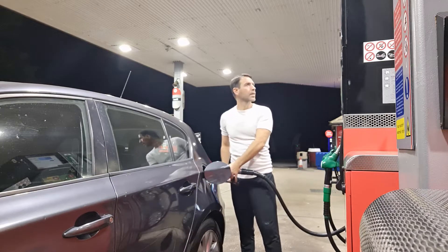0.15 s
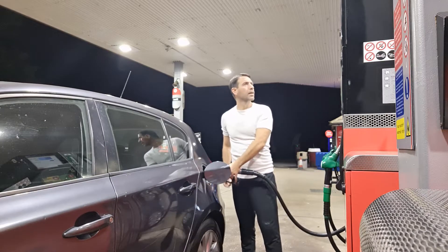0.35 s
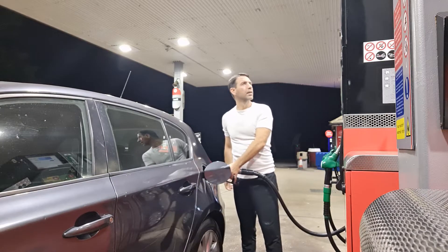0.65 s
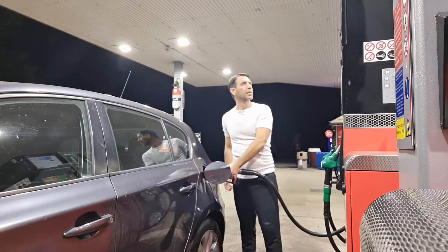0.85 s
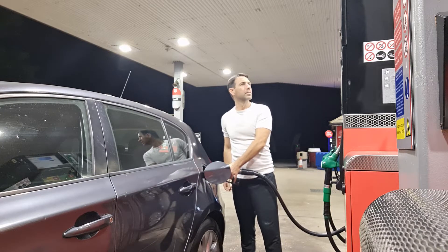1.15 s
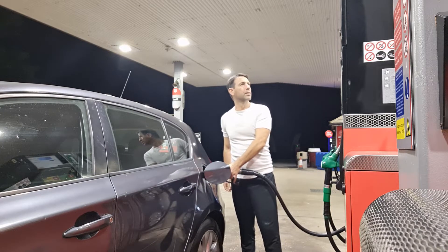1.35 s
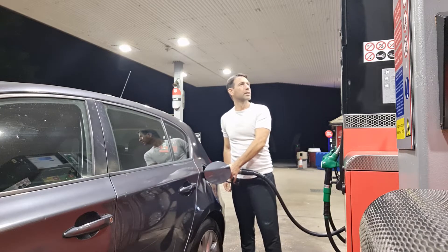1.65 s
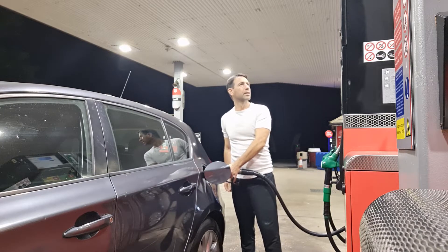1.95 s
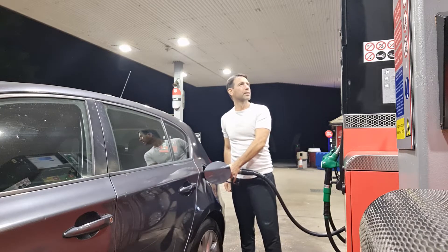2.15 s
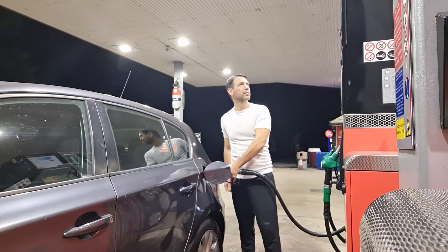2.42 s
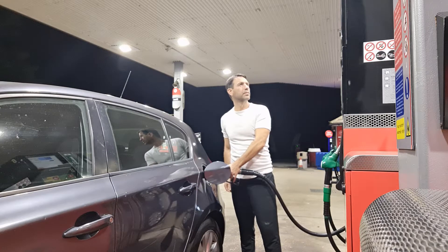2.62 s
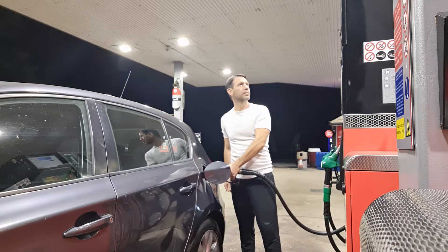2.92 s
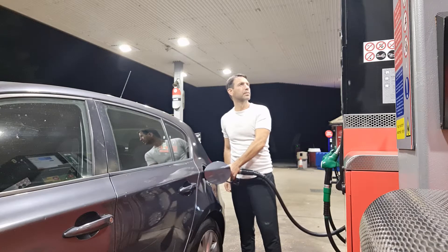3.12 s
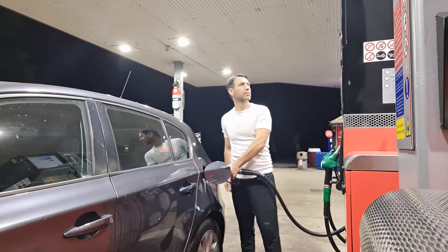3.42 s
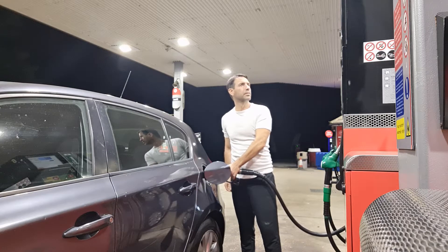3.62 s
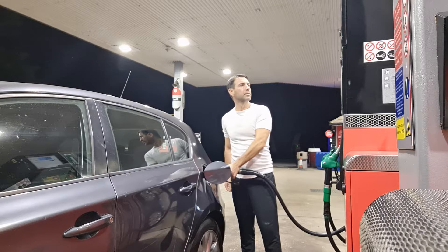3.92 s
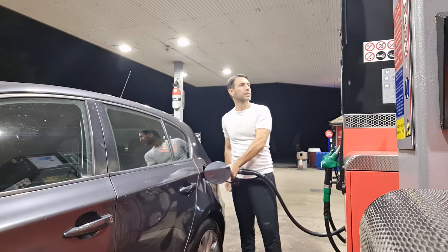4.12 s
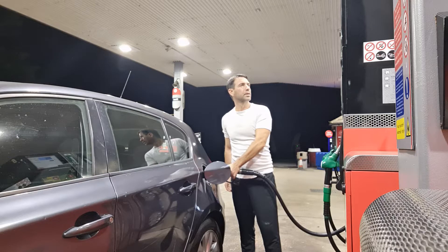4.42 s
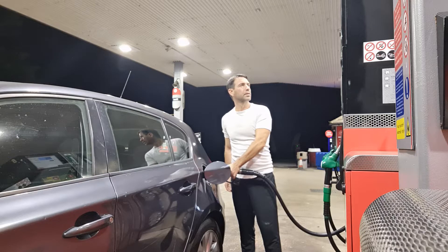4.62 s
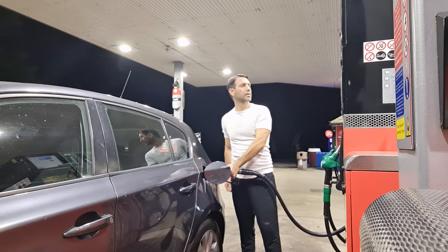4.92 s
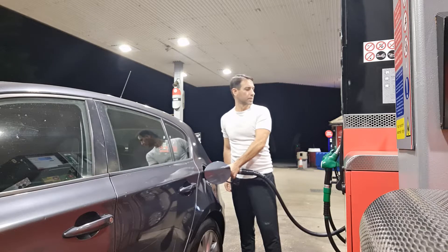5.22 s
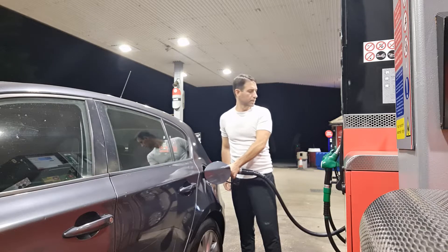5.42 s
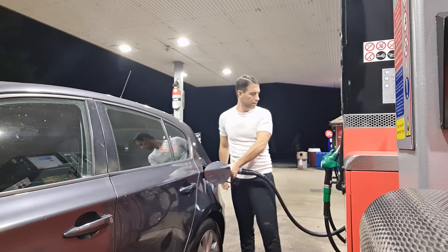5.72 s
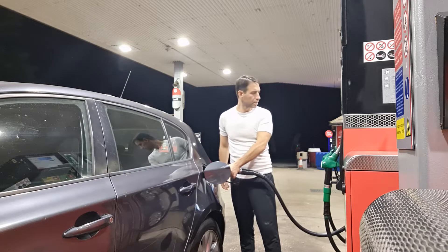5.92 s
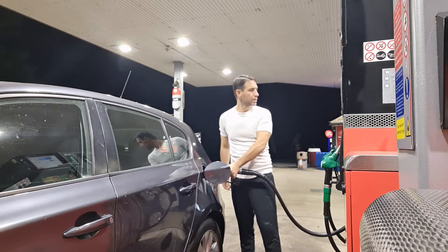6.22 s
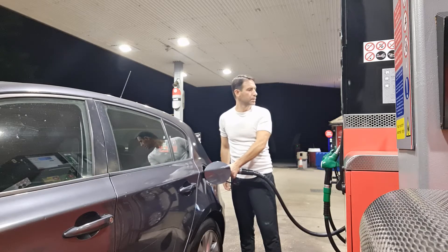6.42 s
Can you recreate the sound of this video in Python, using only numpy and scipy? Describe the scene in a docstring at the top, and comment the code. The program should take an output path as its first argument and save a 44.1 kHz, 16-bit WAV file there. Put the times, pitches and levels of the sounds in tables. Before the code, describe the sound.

A fuel pump hums and rattles steadily while fuel hisses into a car, nozzle knocks, then a heavy clunk as a second motor joins.

```python
"""Petrol station canopy: diesel flows into a car while the dispenser to the right hums, whirs and rattles.
Hum and pump are sums of tones; the rattle is noise pulsed by the pump strokes through panel resonances.
Fuel hiss and forecourt rush are shaped noise; nozzle knocks are damped modes with a short canopy tail.
Near halfway a second motor spins up with a low drone, then a heavy clunk of noise bursts and modes lands;
from there its overtones join, some beating slowly against the pump's."""
import sys
import numpy as np
from scipy import signal
from scipy.fft import rfft, irfft, next_fast_len
from scipy.io import wavfile
from scipy.ndimage import map_coordinates

SR = 44100
rng = np.random.default_rng(int(sys.argv[2]) if len(sys.argv) > 2 else 0)


def master_out(mix):
    """Clip the mix to full scale and print it as 16-bit PCM to the path in sys.argv[1]."""
    frames = np.transpose(np.atleast_2d(mix))
    ceiling = np.clip(frames, -1, 1)
    pcm = np.round(ceiling * 32767).astype(np.int16)
    wavfile.write(sys.argv[1], SR, pcm)


N = 289296
TIME_S = np.arange(N) / SR


def amp(db):
    """Decibels to gain."""
    return 10 ** (np.asarray(db) / 20)


def unit(x):
    """Scaled to rms 1."""
    return x / np.sqrt(np.mean(x ** 2) + 1e-20)


def along(points, hz):
    """Interpolate (hz, value) points on a log-frequency axis."""
    point_hz, values = np.transpose(points)
    return np.interp(np.log(hz + 1), np.log(point_hz + 1), values)


def wobble(rate_hz):
    """A smooth random curve with rate_hz knots a second."""
    knots = rng.standard_normal(int(N * rate_hz / SR) + 4)
    return map_coordinates(knots, [TIME_S * rate_hz])


def filtered(x, response):
    """x times a response of frequency, zero-padded."""
    n = x.shape[-1]
    padded = next_fast_len(n + 8192)
    spectrum = rfft(x, padded) * response(np.fft.rfftfreq(padded, 1 / SR))
    return irfft(spectrum, padded)[..., :n]


def coloured(x, spectrum):
    """x given a (hz, level_db) spectrum, at rms 1."""
    return unit(filtered(x, lambda hz: amp(along(spectrum, hz))))


def spread(pair, correlation):
    """Two unrelated signals become left and right with the given (hz, correlation) points."""
    def shares(hz):
        angle_rad = np.arccos(np.clip(along(correlation, hz), -1, 1)) / 2
        return np.array([np.cos(angle_rad), np.sin(angle_rad)])
    mid, side = filtered(pair, shares)
    return np.array([mid + side, mid - side])


def pan(left_minus_right_db):
    """Left and right gains for a level difference."""
    return amp(np.array([[.5], [-.5]]) * left_minus_right_db)


def from_right(pair, lag_s):
    """The left ear hears the sound lag_s after the right: half the lag as phase on each side."""
    return filtered(pair, lambda hz: np.exp(1j * np.pi * hz * lag_s * np.array([[-1], [1]])))


def add(track, start_s, sound):
    """Mix a sound into the track, cut at the track's end."""
    part = track[:, round(start_s * SR):][:, :sound.shape[-1]]
    part += sound[..., :part.shape[-1]]


def ring(modes, t_s, attack_s):
    """Damped (hz, level_db, t60_s) modes, each struck at a slightly random strength."""
    scatter_db = rng.normal(0, 1.2, len(modes))
    waves = 0
    for (hz, level_db, t60_s), offset_db in zip(modes, scatter_db):
        waves = waves + amp(level_db + offset_db - 60 * t_s / t60_s) * np.sin(2 * np.pi * hz * t_s)
    return waves * (1 - np.exp(-t_s / attack_s))


def line(phase_rad, left_db, right_db, waver_db):
    """One machine tone; it wavers and reaches the two ears slightly out of step."""
    phase_rad = phase_rad + rng.uniform(0, 2 * np.pi) + 0.18 * wobble(5.9)
    phase_rad = phase_rad + 0.14 * rng.standard_normal((2, 1))
    gain = np.sqrt(2) * amp([[left_db], [right_db]]) * amp(waver_db * wobble(3.025))
    return gain * np.sin(phase_rad)


def ramp(start_s, length_s):
    """A raised-cosine step from 0 to 1."""
    return (1 - np.cos(np.pi * np.clip((TIME_S - start_s) / length_s, 0, 1))) / 2


# second motor's start, spin-up, then labouring hold and release
START_S, SPIN_UP_S, STRAIN_HOLD_S, STRAIN_RELEASE_S = 2.75, 0.63, 0.6, 0.94


def running():
    """How far the second motor has come up to speed, 0-1."""
    return ramp(START_S, SPIN_UP_S)


def strain():
    """How hard the second motor labours, 0-1: it rises with the spin-up, holds and lets go."""
    return running() * (1 - ramp(START_S + SPIN_UP_S + STRAIN_HOLD_S, STRAIN_RELEASE_S))


def under_load(alone_db, running_change_db, strain_change_db):
    """The level in dB of a sound that responds to the second motor's load."""
    return alone_db + running_change_db * running() + strain_change_db * strain()


# pump tones: shaft_order (rounded when played; entries above 22 ease off), left_db, right_db
PUMP_ORDERS = [(5, -67, -62), (6, -57, -51.5), (8, -45.5, -40), (9, -49, -47.5), (10, -60, -47.5),
               (12, -55, -43), (14, -55.5, -54.5), (15, -52, -58), (16, -56, -46), (18, -55, -49),
               (20, -58.5, -55.5), (21, -63, -61.5), (22.2, -67, -68), (24, -55, -51), (26, -61, -49.5),
               (28, -72, -58), (32, -63.5, -56)]
# mains hum: alone_db, running_change_db, strain_change_db
HUM_LOAD = (-26, -0.5, -2.5)
SHAFT_HZ, HUM_HZ, FAN_HZ = 33.125, 99.8, 115
WHINE_DB, WHINE_EASED_DB, EASE_AT_S, EASE_S = 0.6, -15, 3.92, 0.5  # upper orders: gain before, after


def pump(shaft_rad):
    """Mains hum that sags under load, a fan tone and the pump's shaft orders; the upper ones ease off."""
    hum_db = under_load(*HUM_LOAD) + 0.47 * wobble(3.95) + 0.13 * wobble(11)
    hum = np.sqrt(2) * amp(hum_db) * np.sin(2 * np.pi * HUM_HZ * TIME_S)
    fan = line(2 * np.pi * FAN_HZ * TIME_S, left_db=-41.5, right_db=-40.5, waver_db=3.4)
    whine = amp(WHINE_DB + (WHINE_EASED_DB - WHINE_DB) * ramp(EASE_AT_S, EASE_S))
    orders = 0
    for order, left_db, right_db in PUMP_ORDERS:
        tone = line(round(order) * shaft_rad, left_db, right_db, waver_db=1.63)
        orders = orders + tone * (whine if order > 22 else 1)
    return hum * pan(-0.022) + fan + orders


# dispenser panel resonances: centre_hz, width_hz, level_db
PANEL_MODES = [(278, 33, -1), (303.8, 21.8, 2.5), (387, 49, -14.5), (513, 80, -16), (720, 176, -21),
               (865, 98, -17), (1118, 62, -17)]
# rattle: alone_db, running_change_db, strain_change_db
RATTLE_LOAD = (-35.5, 0.73, -1.5)


def panel_response(hz):
    """Parallel band-pass resonances of alternating sign."""
    total = 0
    for k, (centre_hz, width_hz, level_db) in enumerate(PANEL_MODES):
        band = 1j * hz * width_hz
        total = total + (-1) ** k * amp(level_db) * band / (centre_hz ** 2 - hz ** 2 + band)
    return total


def rattle(shaft_rad):
    """Two uneven strokes a turn shake the dispenser's panels."""
    strokes = np.exp(0.4 * np.cos(2 * shaft_rad)) * amp(1.5 * wobble(45))
    noise = strokes * rng.standard_normal((2, N))
    shake = from_right(spread(noise, [(300, 0.95), (1100, 0.64)]), lag_s=0.00019)
    damping = [(100, 2), (250, -0.5), (1150, 0.5), (1450, -4), (4000, -30)]  # hz, level_db
    panels = coloured(filtered(shake, panel_response), damping)
    return panels * amp(under_load(*RATTLE_LOAD)) * pan(-3)


def reflected(x, echo_db, count):
    """Weak copies off car, dispenser and ground within 20 ms ripple the spectrum."""
    delays_s = rng.uniform(.001, .02, (2, count))
    signs = rng.choice([-1, 1], (2, count))
    copies = []
    for side, side_delays_s, side_signs in zip(x, delays_s, signs):
        copies.append(sum(sign * np.roll(side, round(delay_s * SR))
                          for delay_s, sign in zip(side_delays_s, side_signs)))
    return x + amp(echo_db) * unit(np.array(copies)) * np.std(x)


# hiss spectrum shape: hz, relative_db_per_hz
HISS_SPECTRUM = [(500, -32), (1000, -1.5), (1450, -3), (1850, 3.5), (2500, -1.5), (3300, -1), (4200, -6.5),
                 (5200, -6), (6100, -10.5), (7500, -10), (8900, -16), (11500, -12.5), (13500, -14.5),
                 (15700, -20.5)]
# hiss stereo likeness: hz, left_right_correlation
HISS_CORRELATION = [(600, .6), (1050, 0.032), (1250, -0.3), (1900, -0.26), (2700, 0.011)]
# hiss stereo balance: hz, left_minus_right_db
HISS_BALANCE = [(700, 0), (1250, 12), (1900, 0), (2400, -1), (3300, -3), (4400, 2.5), (6000, -3.5),
                (8500, 2.5), (10500, 5), (12500, 2.5), (15500, 2)]
# jet strength: time_s, level_db
JET_LEVEL = [(0, -44), (0.8, -44), (1.5, -44.7), (2.15, -44), (3, -45), (3.9, -46.5), (4.65, -47.5),
             (5.2, -46.5), (5.8, -45), (6.56, -46)]


def fuel():
    """The jet hisses in the filler neck in small surges, with a fizz of bursting foam."""
    bursts_per_s = 500
    foam = (rng.random((2, N)) < bursts_per_s / SR) * rng.standard_normal((2, N))
    jet = reflected(rng.standard_normal((2, N)), echo_db=-10.0, count=8) + amp(-13) * unit(foam)
    hiss = coloured(spread(jet, HISS_CORRELATION), HISS_SPECTRUM)
    hiss = filtered(hiss, lambda hz: pan(along(HISS_BALANCE, hz)))
    surge_db = 0.78 * wobble(16) + 0.65 * wobble(70)
    return hiss * amp(np.interp(TIME_S, *np.transpose(JET_LEVEL)) + surge_db)


# station rush spectrum shape: hz, relative_db_per_hz
FORECOURT_SPECTRUM = [(20, -20), (38, -11), (55, -2.5), (80, 3), (125, -6), (180, -6), (260, -7),
                      (380, -12), (560, -15), (900, -17.5), (1400, -25.5), (3000, -42), (8000, -80)]
# scattered sound, also for the clunk: hz, left_right_correlation
DIFFUSE_CORRELATION = [(100, 0.94), (250, .92), (500, 0.4), (850, 0.72), (1300, 0)]


def forecourt():
    """The steady low rush of the station: shaped diffuse noise."""
    noise = spread(rng.standard_normal((2, N)), DIFFUSE_CORRELATION)
    return amp(-37.5) * coloured(noise, FORECOURT_SPECTRUM) * pan(-0.32)


# nozzle bumps: start_s, knock_db, body_thump_db
KNOCK_EVENTS = [(.119, -22.5, -33), (.139, -20, -36), (.158, -29.5, -40), (.667, -31, -60),
                (.677, -21, -42), (.688, -26, -60), (2.355, -40, -60), (3.086, -28, -52), (3.822, -31, -57),
                (4.936, -31, -60), (5.241, -29, -60), (5.47, -30, -60)]
# filler neck modes: hz, level_db, t60_s
NECK_MODES = [(242, -9.5, 0.05), (316.5, 6.5, 0.058), (421, 2, 0.043), (557, -5.5, 0.066),
              (748, -2.5, 0.04), (876, -2, 0.035), (1340, -8.5, 0.024)]
# low thud modes, also for the clunk: hz, level_db, t60_s
THUD_MODES = [(56.8, 3, .28), (50, -15, 0.2), (141, -9, 0.226), (220.5, -8.5, 0.196), (250, -21, 0.28),
              (318, -18, .16)]


def knocks():
    """The nozzle bumps dully in the filler neck; firmer bumps thump the car body."""
    out = np.zeros((2, N))
    t_s = np.arange(SR // 3) / SR
    for start_s, knock_db, thump_db in KNOCK_EVENTS:
        knock = amp(knock_db) * ring(NECK_MODES, t_s, attack_s=0.0019)
        thump = amp(thump_db) * ring(THUD_MODES, t_s, attack_s=0.008)
        add(out, start_s, knock + thump)
    return from_right(out, lag_s=0.00028) * pan(-4)


# canopy decay: hz, t60_s
CANOPY_DECAY = [(100, 1), (700, 0.6), (3000, 0.38), (12000, 0.32)]


def canopy(x):
    """The roof answers with a short diffuse tail; the bass escapes through the open sides."""
    hz, t_s, bins = signal.stft(rng.standard_normal((2, SR // 2)), SR, nperseg=256)
    decay = amp(-60 * t_s / along(CANOPY_DECAY, hz)[:, None]) * (1 - np.exp(-t_s / 0.012))
    tail = signal.istft(bins * decay, SR, nperseg=256)[1]
    held = filtered(x, lambda hz: amp(along([(70, -16), (250, 0.5)], hz)))
    return signal.fftconvolve(held, tail / np.linalg.norm(tail[0]), axes=1)[:, :N]


# second motor overtones: shaft_order, left_db, right_db, drift_db_per_s (from the thud on)
SECOND_ORDERS = [(4, -42, -39, -1), (5, -46.5, -45, -1), (13, -58, -56, -2), (15, -55, -50.5, 2),
                 (16, -59, -52, 1.5), (18, -66, -60, 0.5), (21, -68, -57, 1)]
SECOND_HZ, DRONE_DB, DRONE_STRAIN_DB = 33.09, -29.5, 3.5  # drone settled; added while labouring
THUD_AT_S, THUD_DB = 3.175, -5.5


def second_motor():
    """A slightly slower motor: drone at twice shaft rate, louder under strain; overtones drift in level."""
    shaft_rad = 2 * np.pi * SECOND_HZ * TIME_S + 0.069 * wobble(2.015)
    drone_db = DRONE_DB + DRONE_STRAIN_DB * strain() + 0.36 * wobble(2.8)
    tone = np.sin(2 * shaft_rad + np.array([[.1], [-.1]]))
    drone = np.sqrt(2) * running() * amp(drone_db) * tone * pan(-2.1)
    age_s = np.maximum(TIME_S - THUD_AT_S, 0)
    overtones = 0
    for order, left_db, right_db, drift_db_per_s in SECOND_ORDERS:
        overtone = line(round(order) * shaft_rad, left_db, right_db, waver_db=2.3)
        overtones = overtones + amp(drift_db_per_s * age_s) * overtone
    return drone + np.minimum(age_s / 0.36, 1) * overtones


# latch contacts: start_s, clatter_db, ring_db
LATCH_EVENTS = [(3.148, -24.5, -13.5), (3.153, -17.5, -27), (3.166, -26, -28), (3.183, -19.5, -22),
                (3.21, -30, -32), (3.227, -33, -31)]
# latch modes: hz, level_db, t60_s
LATCH_MODES = [(354, -7, 0.16), (434, -1.5, 0.1), (527, -11, .08), (626, -14, 0.096), (737, -10, 0.15),
               (2510, -18, 0.057)]
# clatter spectrum shape: hz, relative_db_per_hz
CLATTER_SPECTRUM = [(30, -19), (150, 4.5), (230, 6.5), (420, 4), (720, -4), (1050, -8.5), (1500, -17),
                    (2100, -16.5), (2700, -13.5), (3700, -22.5), (5000, -23.5), (7500, -26.5),
                    (10000, -37.5), (15500, -33)]


def clunk():
    """A latch cracks, clatters and rings, and a heavy panel lands among its contacts with a low thud."""
    out = np.zeros((2, N))
    t_s = np.arange(SR // 2) / SR
    for start_s, clatter_db, ring_db in LATCH_EVENTS:
        noise = spread(rng.standard_normal((2, len(t_s))), DIFFUSE_CORRELATION)
        grit = coloured(noise, CLATTER_SPECTRUM)
        fall = amp(-60 * t_s / 0.19) + amp(-3.5 - 60 * t_s / 0.024)  # longer rattle + brief crack
        fall = fall * (1 - np.exp(-t_s / 0.0017))
        ringing = amp(ring_db) * ring(LATCH_MODES, t_s, attack_s=0.00087)
        add(out, start_s, (amp(clatter_db) * grit * fall + ringing) * pan(-4.5))
    add(out, THUD_AT_S, amp(THUD_DB) * ring(THUD_MODES, t_s, attack_s=0.014) * pan(-2.0))
    return from_right(out, lag_s=0.000315)


def scene():
    """Machines, fuel and blows under the canopy; only the blows get its tail."""
    shaft_rad = 2 * np.pi * SHAFT_HZ * TIME_S + 0.014 * wobble(2.085)
    machines = pump(shaft_rad) + rattle(shaft_rad) + second_motor()
    blows = knocks() + clunk()
    return machines + fuel() + forecourt() + blows + amp(-11.0) * canopy(blows)


def record(dry):
    """The microphone sheds the deepest bass and keeps nothing above its band limit."""
    top_hz = 15700
    low_cut = signal.butter(3, 38, "highpass", fs=SR, output="sos")
    return filtered(signal.sosfilt(low_cut, dry), lambda hz: hz < top_hz)


dry = scene()
out = record(dry)
master_out(out)
```